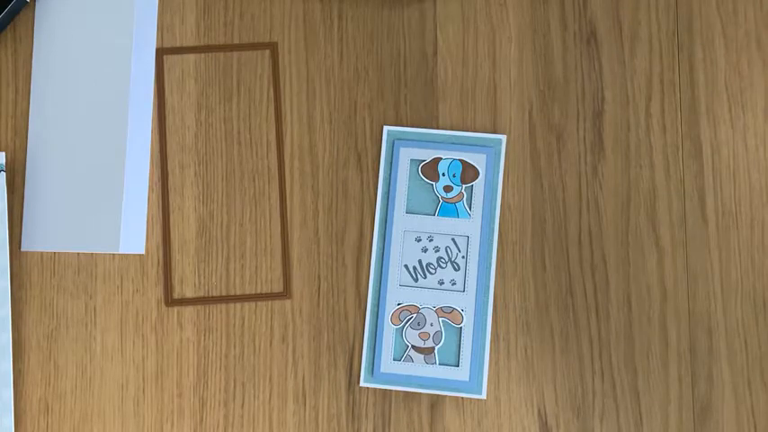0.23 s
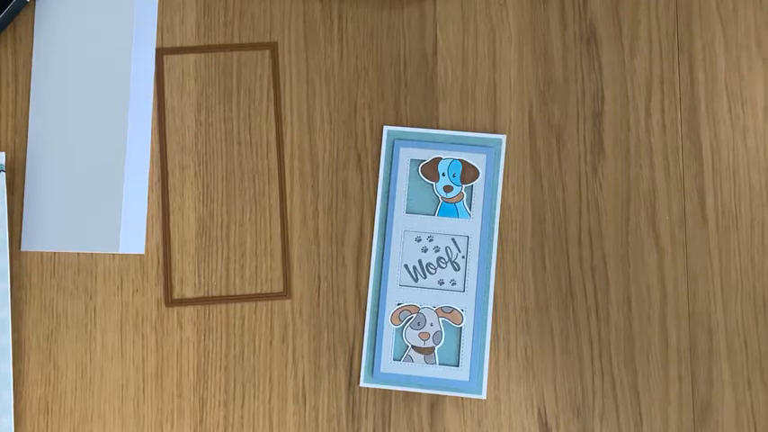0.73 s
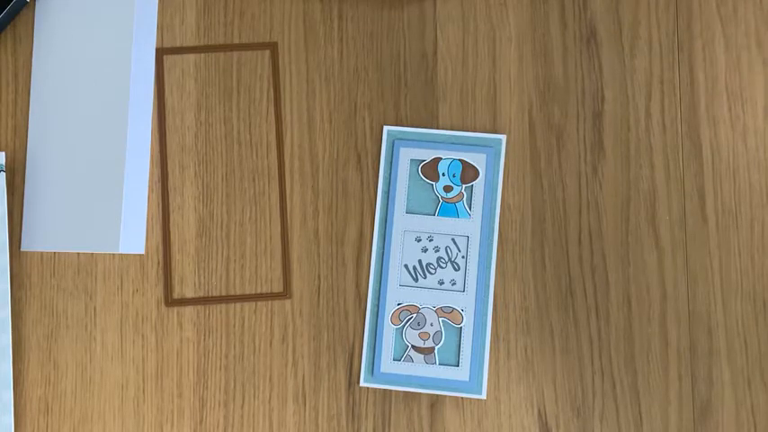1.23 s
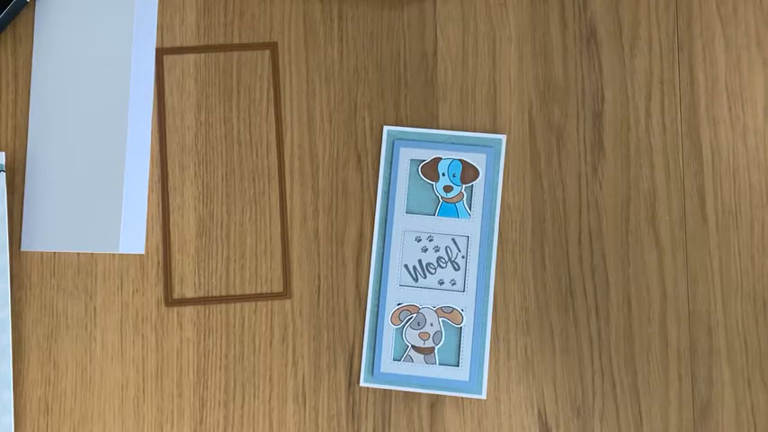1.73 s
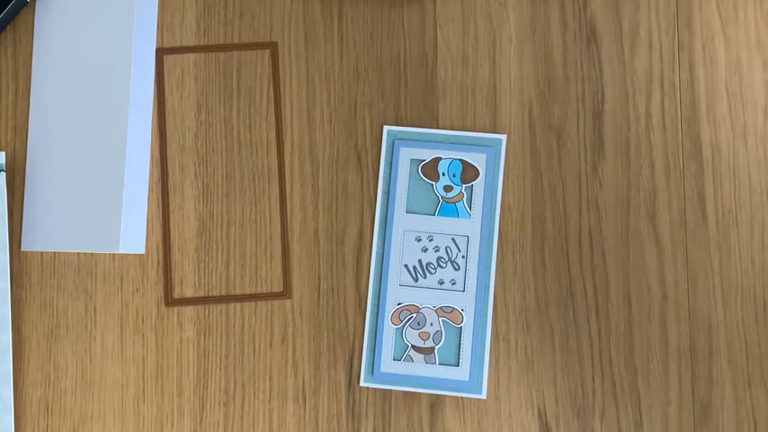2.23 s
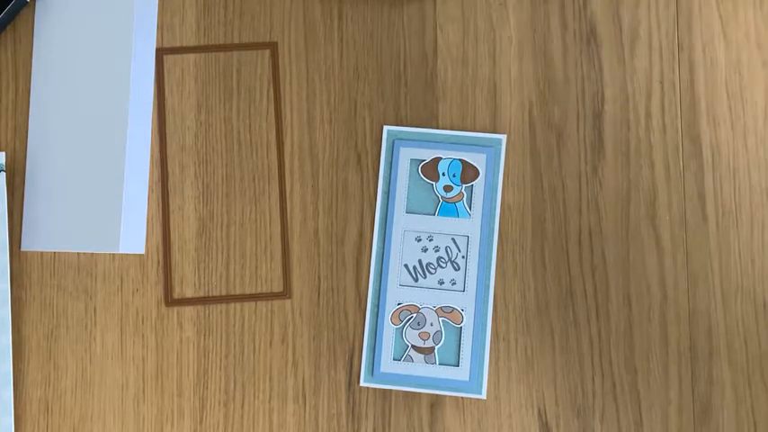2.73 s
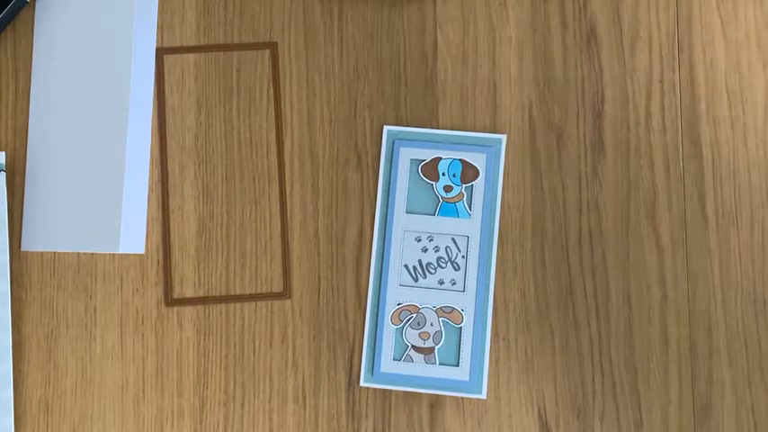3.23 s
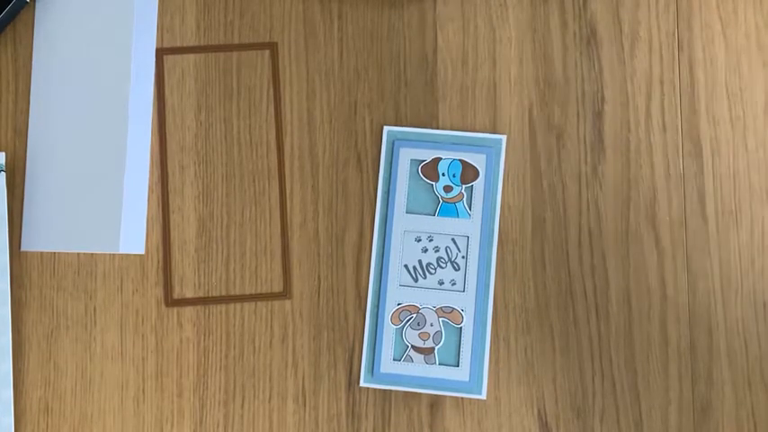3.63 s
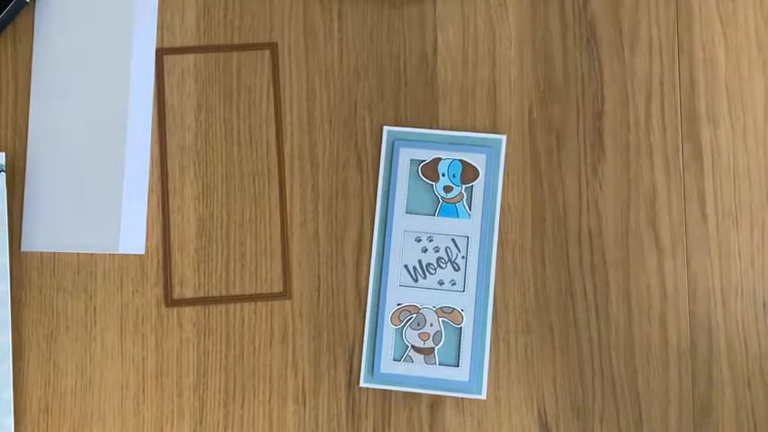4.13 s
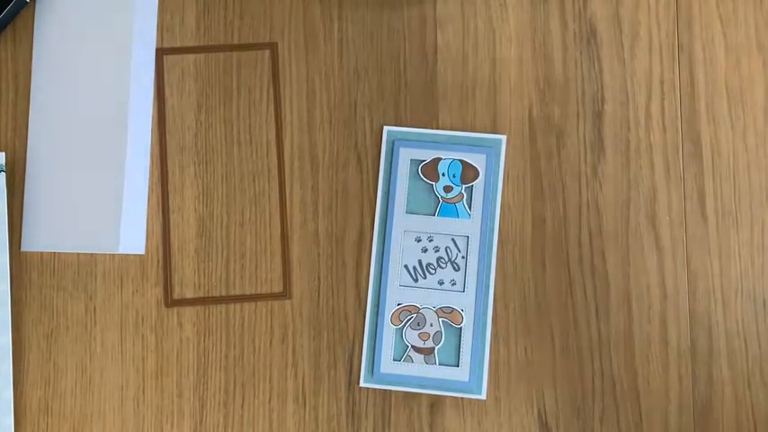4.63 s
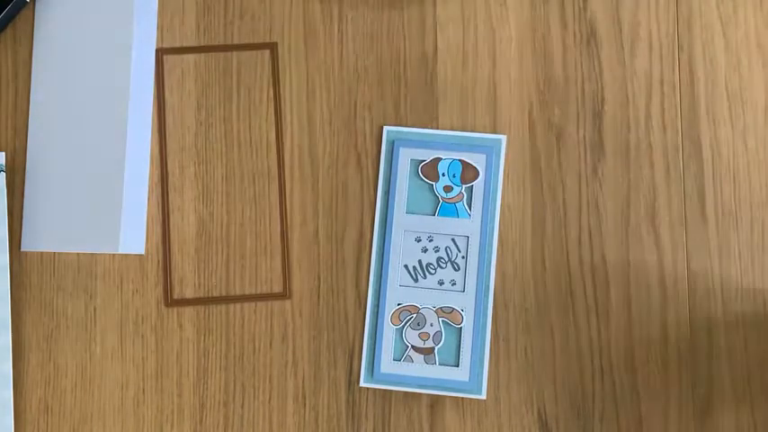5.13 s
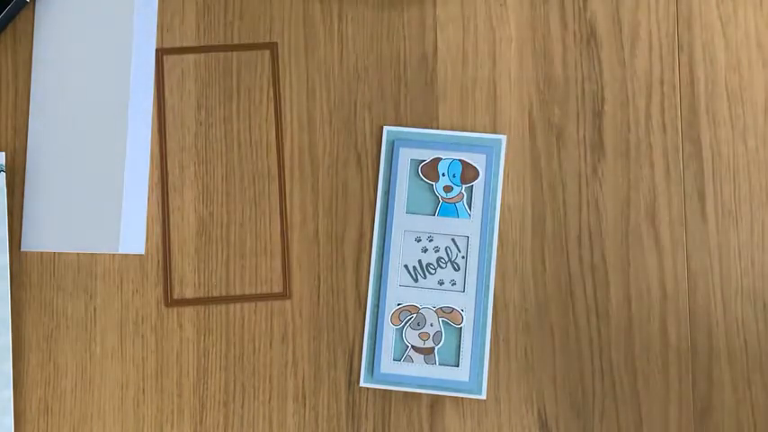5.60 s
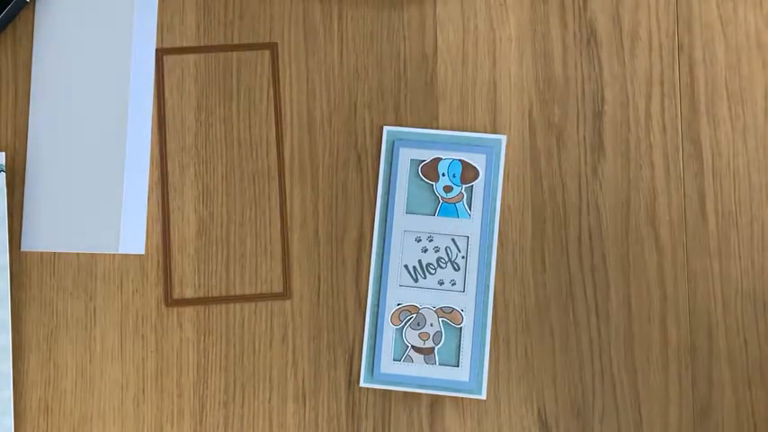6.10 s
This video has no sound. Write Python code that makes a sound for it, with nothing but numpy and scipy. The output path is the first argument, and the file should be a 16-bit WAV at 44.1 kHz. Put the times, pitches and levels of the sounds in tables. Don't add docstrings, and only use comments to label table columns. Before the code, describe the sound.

A close microphone catches a paper trimmer on a wooden table, over a faint hush of room air. First come sparse papery brushes and small taps, one sharper. Then a brief gritty cut sings and ends in a hollow thump and bright clack. The blade scrapes and knocks as it is raised; afterwards there are only quiet ticks and light paper slides with a short room tail.

```python
import sys
import numpy as np
from scipy import signal
from scipy.fft import rfft, irfft, next_fast_len
from scipy.io import wavfile
from scipy.ndimage import uniform_filter1d

SR = 44100
rng = np.random.default_rng(int(sys.argv[2]) if len(sys.argv) > 2 else 0)


def dump_mix(stems):
    frames = np.atleast_2d(stems).T
    limited = np.clip(frames, -1, 1)
    pcm = np.round(limited * 32767).astype(np.int16)
    wavfile.write(sys.argv[1], SR, pcm)


def volts_from_decibels(level):
    exponent = np.asarray(level, float) / 20
    return 10 ** exponent


N = 280520

# mode_hz, width_hz, level_db
BASE_MODES = [(122, 21, -7.5), (154.7, 14, 1.5), (183.5, 22, -8), (233, 17, -4.5), (285, 32, -4),
              (343, 19, -4), (425, 39, 1.5), (503.6, 28, -6), (592, 40, 0), (712, 100, -4.5), (830, 37, -2),
              (977, 45, -4), (1204, 34, -4), (1460, 88, -3)]
# mode_hz, width_hz, gain_db, from_s, to_s
STEEL_MODES = [(15563, 5, 17, 2.7, 3.8), (14050, 4, 10, 3.56, 3.8), (11800, 14, 7, 3.74, 3.8),
               (9500, 60, 10, 3.75, 3.78), (7900, 40, 10, 3.75, 3.79)]


def evened(x):
    return x / np.sqrt(np.mean(x ** 2) + 1e-20)


def read(points, hz):
    f, value = np.transpose(points)
    return np.interp(np.log(hz + 1), np.log(f + 1), value)


def add(mix, s, sound):
    part = mix[round(s * SR):][:len(sound)]
    part += sound[:len(part)]


def colour(x, points):
    size = next_fast_len(len(x))
    gain = volts_from_decibels(read(points, np.fft.rfftfreq(size, 1 / SR)))
    return evened(irfft(rfft(x, size) * gain, size)[:len(x)])


def band_pass(x, low_hz, high_hz):
    return signal.sosfilt(signal.butter(2, (low_hz, high_hz), "band", fs=SR, output="sos"), x)


def resonate(x, hz, width):
    pole = np.exp((2j * np.pi * hz - np.pi * width) / SR)
    return 2 * signal.lfilter([1 - abs(pole)], [1, -pole], x).real


def nearness(hz, centre_hz, octaves):
    return np.exp(-.5 * (np.log2(hz / centre_hz) / octaves) ** 2)


def drift(shape, bins, frames):
    patches = uniform_filter1d(rng.standard_normal(shape), bins, axis=0)
    return evened(uniform_filter1d(patches, frames, axis=1))


def wander(size):
    return evened(uniform_filter1d(uniform_filter1d(rng.standard_normal(N), size=size), size=size))


def hush():
    # pitch_hz, level_db (per Hz)
    air = [(15, -31), (25, -30), (52, 4), (75, 3.5), (323, -5.5), (390, -7), (568, -7.5), (633, -10),
           (1810, -20), (4400, -24.5), (5910, -20.5), (10100, -30.5), (14400, -30.5), (15600, -35)]
    hz, t, z = signal.stft(colour(rng.standard_normal(N), air), SR, nperseg=1024)
    lumps = volts_from_decibels(1.46 * drift(z.shape, 6, 5))
    return volts_from_decibels(-69.5 + 2.1) * signal.istft(z * lumps, nperseg=1024)[1][:N]


def swells(s, db, rise, fall, bend):
    late = np.arange(0, N / SR + .001, .001) - np.asarray(s)[:, None]
    away = np.where(late < 0, -late / np.reshape(rise, (-1, 1)), late / np.reshape(fall, (-1, 1)))
    return volts_from_decibels(2 * np.maximum(np.asarray(db)[:, None] - 20 * away ** bend, -140))


def gestures():
    # peak_s, peak_db, fall_s (to -20 dB), lightness (0-1)
    scuff = np.transpose([(.368, -70, .2, .6), (1.173, -58, .055, .02), (1.4, -66, .12, .13),
                          (1.567, -65, .075, .13), (1.748, -61.5, .09, .1), (1.787, -60, .08, .05),
                          (1.895, -46.5, .145, .47), (2.218, -60, .095, .17), (2.361, -57, .09, .6),
                          (2.514, -44, .075, .02), (3.112, -39, .09, .42), (3.414, -54, .24, .55),
                          (3.8, -46, .11, .15), (4.842, -61.5, .2, .5), (5.3, -69, .3, .55)])
    # peak_s, peak_db, rise_s, fall_s (20 dB each), lightness (0-1)
    sweep = np.transpose([(.01, -73, .1, .4, .3), (.495, -63, .1, .07, .47), (.68, -63, .07, .21, .47),
                          (.896, -68.5, .14, .23, .51), (3.02, -37.5, .13, .075, .42),
                          (3.3, -66, .3, .2, .53), (3.5, -65.5, .1, .12, .99), (3.548, -52, .035, .13, .99),
                          (3.592, -49.5, .09, .055, .89), (3.704, -46.5, .05, .07, .2),
                          (3.772, -39, .045, .082, .63), (4.205, -68.5, .12, .3, .5),
                          (4.345, -63.5, .09, .13, .65), (4.48, -68.5, .15, .22, .55),
                          (4.955, -63, .08, .12, .3), (5.055, -55, .13, .16, .52),
                          (5.205, -63.5, .14, .09, .55), (5.69, -65, .19, .55, .92),
                          (5.82, -69.5, .15, .2, .8), (6.006, -58, .28, .085, .82),
                          (6.052, -60.5, .1, .05, .2), (6.135, -66, .05, .2, .74),
                          (6.195, -60, .03, .15, .2), (6.27, -64, .26, .23, .95)])
    # peak_s, peak_db, fall_s (to -20 dB), centre_hz
    load = np.transpose([(.525, -52.5, .09, 560), (.585, -55, .15, 560), (.896, -65, .3, 435),
                         (1.195, -62, .07, 360), (1.41, -61.5, .06, 397), (1.582, -59.5, .06, 408),
                         (1.788, -53.5, .045, 504), (1.915, -54, .12, 520), (1.98, -55, .07, 514),
                         (2.24, -57.5, .053, 640), (2.374, -53.5, .063, 240), (2.526, -43, .042, 555),
                         (3.022, -31, .058, 290), (3.125, -45, .08, 478), (3.26, -63, .2, 365),
                         (3.44, -45.5, .11, 290), (3.63, -48.5, .2, 415), (3.704, -45.5, .06, 622),
                         (3.774, -47.5, .16, 730), (3.925, -54, .22, 300), (4.198, -64.5, .12, 375),
                         (4.344, -61.5, .3, 327), (4.565, -56, .075, 330), (4.855, -59.5, .17, 860),
                         (4.952, -59, .065, 950), (5.05, -58, .17, 480), (5.615, -59, .1, 560),
                         (5.82, -62, .09, 433), (6.065, -57, .06, 595), (6.2, -58.5, .057, 443)])
    # time_s, pressure_db, load_db (on the base, re pressure)
    cut = np.transpose([
        (2.6, -84, 12),
        (2.708, -38, -2.5),
        (2.752, -36.5, -6),
        (2.868, -28, -4),
        (2.93, -31, -17),
        (2.962, -34, -.6),
        (2.98, -42, -3),
        (3.0, -62, -3),
        (3.04, -120, -3),
    ])
    s = np.arange(0, N / SR + .001, .001)
    pressure_db = np.interp(s, cut[0], cut[1], left=-140, right=-140)

    def rubbing(span):
        scuffs = swells(*scuff[:2], .007, span * scuff[2], 1.1)
        sweeps = swells(*sweep[:2], *span * sweep[2:4], 1.25)
        return np.vstack([scuffs, sweeps, volts_from_decibels(2 * pressure_db)])

    rubs = rubbing(1)
    quick = rubbing(.72)
    rub = rubs.sum(axis=0)

    light = np.r_[scuff[3], sweep[4], .55]
    firm_sheen_db, light_sheen_db, firm_rub_hz, light_rub_hz = -35, 12, 1950, 5600
    sheen = volts_from_decibels(2 * (firm_sheen_db + (light_sheen_db - firm_sheen_db) * light)) @ quick / rub
    rub_hz = (firm_rub_hz * (light_rub_hz / firm_rub_hz) ** light ** 2.6) @ rubs / rub

    cut_load_db = pressure_db + np.interp(s, cut[0], cut[2])
    hums = np.vstack([swells(*load[:2], .45 * load[2], load[2], 1.15), volts_from_decibels(2 * cut_load_db)])
    hum = hums.sum(axis=0)
    hum_hz = np.r_[load[3], 510] @ hums / hum
    return s, 10 * np.log10(rub), 10 * np.log10(sheen), 10 * np.log10(hum), hum_hz, rub_hz


def fibres(per_s, size_db, clump_db, smooth):
    clumps = wander(300)
    sizes = volts_from_decibels(size_db * np.minimum(rng.exponential(1, N), 3.2))
    snaps = (rng.random(N) < per_s / SR) * sizes * rng.standard_normal(N)
    return volts_from_decibels(clump_db * clumps) * (evened(snaps) + smooth * rng.standard_normal(N))


def scrape(drive, s, rub_db, rub_hz):
    # pitch_hz, level_db (per Hz)
    rub_spectrum = [(410, -36), (700, -11), (813, -5), (924, -1), (1170, 1), (2130, -2), (3400, -4.5),
                    (4540, -3), (9000, -17.5), (11700, -56), (19800, -120)]
    # mode_hz, width_hz, level_db
    blade_modes = [(1470, 14, 10), (2060, 38, -5), (3820, 88, -9), (3880, 53, -9), (4140, 230, -21.5),
                   (4070, 23, -3.5), (4420, 90, 13), (5640, 93, 15)]
    hz, t, z = signal.stft(colour(drive, rub_spectrum), SR, nperseg=1024, noverlap=768)
    bins_hz = hz[:, None]
    pressure = np.clip((np.interp(t, s, rub_db) + 58) / 25, 0, 1)
    flicker = volts_from_decibels(2.6 * drift((len(blade_modes), len(t)), 1, 7))
    singing = 0
    for (mode_hz, width, db), catching in zip(blade_modes, flicker):
        singing = singing + volts_from_decibels(db) * catching / (1 + (2 * (bins_hz - mode_hz) / (width + 40)) ** 2)
    shape = 1 + 1.44 * nearness(bins_hz + 1, np.interp(t, s, rub_hz), 0.91) + 0.49 * pressure * singing
    shape = shape * volts_from_decibels(2.5 * drift(z.shape, 16, 4))
    shape = shape / np.sqrt(np.average(shape ** 2, axis=0, weights=volts_from_decibels(2 * read(rub_spectrum, hz))))
    return signal.istft(z * shape, nperseg=1024, noverlap=768)[1][:N]


def hiss(drive):
    # pitch_hz, level_db (per Hz)
    trimmer_sheen = [(2650, -12), (4500, -7), (6680, 0), (7260, 1), (8620, -2.5), (14300, -6), (15600, -11)]
    # pitch_hz, level_db (per Hz)
    table_sheen = [(2650, -12), (4500, -4), (6500, -1.5), (7800, 0), (9500, -2), (12500, -2.5), (14500, -4),
                   (15600, -6)]
    on_table_s = 5.52
    return np.where(np.arange(N) < on_table_s * SR, colour(drive, trimmer_sheen), colour(drive, table_sheen))


def base_hum(hum_hz):
    shake = band_pass(fibres(per_s=600, size_db=0.0, clump_db=1.0, smooth=1.21), 200, 900)
    hum, power = np.zeros(N), np.zeros(N)
    for hz, width, db in BASE_MODES[2:]:
        weight = volts_from_decibels(db) * nearness(hz, hum_hz, 0.63)
        hum += weight * evened(resonate(shake, hz, width))
        power += weight ** 2
    return hum / np.sqrt(power)


def slides():
    s, *columns = gestures()
    rub_db, sheen_db, hum_db, hum_hz = (np.interp(np.arange(N) / SR, s, c) for c in columns[:4])
    drive = fibres(per_s=2500, size_db=3., clump_db=1.15, smooth=2.2)
    out = volts_from_decibels(rub_db - 4.0) * scrape(drive, s, columns[0], columns[4])
    out += volts_from_decibels(rub_db + sheen_db - 1.0) * hiss(drive)
    return out + volts_from_decibels(hum_db - 4.0) * base_hum(hum_hz)


def ticks():
    # start_s, peak_db, ring_hz, t60_s, ring_db (re rattle)
    hand_ticks = [(0.4818, -50.5, 3480, 0.12, 15), (0.647, -52.5, 2740, 0.15, 4),
                  (1.1703, -52, 3050, 0.069, 25), (1.399, -60, 1510, 0.18, 15),
                  (1.5614, -53.5, 1450, 0.12, 12), (1.7473, -49.5, 3000, 0.079, 12),
                  (1.781, -48.5, 1502, 0.13, 22), (1.8905, -40, 2280, 0.1, 4),
                  (1.8957, -27, 1570, 0.086, 9), (2.2132, -47, 1510, 0.18, 12),
                  (2.364, -39, 2010, 0.052, 15), (2.5125, -42, 1650, 0.05, 10),
                  (4.1849, -56, 1640, 0.085, 16), (4.2115, -54, 1950, 0.12, 14),
                  (4.328, -51, 3450, 0.16, 11), (4.555, -58, 1200, .06, 8), (4.8289, -53.5, 2530, 0.13, 4),
                  (4.9188, -50.5, 2010, 0.24, 5), (5.0394, -48, 2490, 0.15, 14),
                  (5.2087, -50, 2920, 0.15, 17), (5.3514, -53.5, 3410, 0.12, 14),
                  (5.8336, -46, 4300, 0.12, 9), (6.1154, -44.5, 3330, 0.19, 5),
                  (6.1835, -44, 2050, 0.03, 2)]
    # start_s, peak_db, ring_hz, t60_s, ring_db (re rattle)
    blade_ticks = [
        (2.6444, -42.5, 2430, 0.094, 14),
        (2.6723, -43, 1660, .1, 8),
        (2.6772, -43, 3000, .1, 0),
        (2.684, -35, 1470, 0.25, 14),
        (2.865, -25.5, 1570, 0.34, 17),
        (3.026, -30.5, 1510, 0.23, 10),
        (3.4105, -43, 1548, 0.15, 2),
        (3.5334, -57, 4630, 0.088, 12),
        (3.695, -35, 1460, 0.12, -4),
        (3.7643, -23, 1550, 0.18, -6),
    ]
    out, t = np.zeros(N), np.arange(SR // 4) / SR
    contacts = sorted(hand_ticks + blade_ticks)
    rise = np.minimum(t / 0.0013, 1)
    for (s, db, hz, t60, ring_db), noise in zip(contacts, rng.standard_normal((len(contacts), len(t)))):
        sheen_db = -27 + 12 * np.log2(hz / 1500)
        rattle = noise * (volts_from_decibels(-60 * t / t60) + 0.5 * volts_from_decibels(-60 * t / 0.0027)) * rise
        ring = volts_from_decibels(-60 * t / (.7 * t60)) * np.sin(2 * np.pi * hz * t)
        ring += .7 * volts_from_decibels(-60 * t / .05) * np.sin(2 * np.pi * 1.04 * hz * t)
        sound = band_pass(rattle, 1000, 6750) + volts_from_decibels(ring_db - 19.5) * rise * ring
        sound += volts_from_decibels(sheen_db - 1) * band_pass(rattle, 6500, 12200)
        add(out, s - .002, volts_from_decibels(db - 4.5) * sound / abs(sound).max())
    return out


def thuds():
    # start_s, peak_db, centre_hz, damping (re the free body), spread_octaves
    blows = [(0.507, -45, 443, 0.54, 0.3), (0.554, -43.5, 573, 0.4, 0.54), (1.925, -38.5, 547, 0.78, 0.32),
             (2.214, -51, 820, 0.4, 0.41), (1.781, -52, 550, 1, .5), (2.371, -43, 165, 0.6, 0.4),
             (2.515, -41, 570, 0.78, 0.32), (2.646, -38, 414, 0.4, 0.85), (2.9895, -33, 400, 1.5, .7),
             (2.9945, -19.5, 190, 1.1, 0.85), (3.0105, -20, 165, 1.6, 0.42), (3.042, -33, 200, 2, .5),
             (3.114, -36, 330, 2, .8), (3.411, -37.5, 165, .75, 0.5), (3.446, -45, 140, 1.5, .5),
             (3.467, -41, 160, .6, .4), (3.535, -48, 200, 1.2, .6), (3.608, -45, 150, .6, .4),
             (3.611, -42, 423, 0.86, 0.88), (3.751, -43.5, 555, 0.44, 0.78), (4.209, -52.5, 387, 1, 0.8),
             (4.546, -43.5, 290, 2.4, 0.5), (4.935, -48, 935, 2.6, 0.23), (5.566, -53, 850, 0.54, 0.7),
             (6.044, -47.5, 800, 0.9, 0.6), (6.189, -51, 435, 0.63, 0.76)]
    out, t = np.zeros(N), np.arange(SR // 2) / SR
    for (s, db, centre_hz, damping, octaves), chance in zip(blows, rng.random((len(blows), len(BASE_MODES)))):
        sound = np.zeros(len(t))
        for (hz, width, mode_db), c in zip(BASE_MODES, chance):
            level = volts_from_decibels(mode_db) * nearness(hz, centre_hz, octaves)
            decay = np.exp(-np.pi * width * damping * t)
            sound += level * decay * np.sin(2 * np.pi * (hz * t + .5 + 0.37 * c))
        contact_s = 1.126 / centre_hz
        sound = sound * np.sin(np.pi / 2 * np.minimum(t / contact_s, 1)) ** 2
        add(out, s - 0.915 * contact_s, volts_from_decibels(db - 2.0) * sound / abs(sound).max())
    return signal.sosfilt(signal.butter(2, 85, "high", fs=SR, output="sos"), out)


def catches():
    # peak_s, tone_hz, peak_db, half_length_s
    slip_tones = [(.58, 599, -51, 0.038), (.61, 343, -61, 0.057), (2.686, 1020, -44, .008),
                  (2.71, 1010, -46, .035), (2.72, 1465, -46, .05), (2.739, 2438, -49, .025),
                  (2.755, 822, -41.5, .035), (2.822, 830, -38, .025), (2.745, 425, -36.5, 0.088),
                  (2.787, 1474, -39.5, 0.033), (2.797, 425, -33.5, 0.017), (2.796, 4330, -37, .008),
                  (2.817, 4500, -35, .01), (2.85, 6000, -40, .02), (2.875, 4450, -36, .018),
                  (2.975, 3750, -42, .02), (2.828, 2140, -34.5, .022), (2.86, 425, -32.5, 0.035),
                  (2.87, 2183, -33.5, 0.018), (2.875, 592, -38.5, 0.038), (2.878, 285, -33.5, 0.043),
                  (2.895, 1187, -35.5, 0.031), (2.91, 4610, -35.5, 0.033), (2.92, 1510, -43, 0.018),
                  (2.94, 3930, -38, 0.036), (2.99, 1490, -41.5, 0.031), (3.004, 568, -32.5, 0.0189),
                  (3.034, 425, -33, 0.014), (3.043, 820, -44, 0.024), (3.43, 600, -54, .03),
                  (3.44, 940, -57, .035), (3.465, 560, -54, .02), (3.545, 560, -54, .02),
                  (3.612, 1580, -56, .015), (3.622, 450, -48, .018), (3.652, 370, -50, .015),
                  (3.68, 700, -51.5, 0.035), (3.715, 620, -48, .012), (3.738, 1420, -52, .015),
                  (3.757, 600, -46, .012), (3.795, 2030, -46, .022), (3.825, 800, -51, .025),
                  (3.865, 1380, -58, .022), (3.765, 1480, -44, 0.015), (3.79, 830, -40.5, 0.031),
                  (4.565, 1240, -64.5, 0.017), (4.948, 992, -54.5, 0.021),
                  (.52, 430, -46, .016), (.535, 950, -58, .03), (.7, 450, -60, .04), (.805, 3600, -71, .015),
             (1.79, 520, -56, .015), (1.8, 1550, -60, .025), (1.903, 2450, -46, .014),
             (1.903, 1600, -45, .012), (1.908, 550, -48, .014), (1.94, 560, -44, .009),
             (1.945, 1600, -52, .02), (1.995, 590, -52, .035), (2.385, 2060, -62, .02),
             (2.42, 1590, -63, .022), (2.522, 580, -42, .016), (2.525, 1150, -48, .02),
             (2.53, 1500, -48, .015), (2.558, 1580, -54, .022), (4.57, 700, -60, .015),
             (4.86, 900, -60, .04), (4.95, 1500, -61, .015), (5.03, 2200, -62, .03),
             (5.09, 1550, -60, .025), (5.11, 2200, -63, .02), (6.005, 3350, -60, .035),
             (6.015, 1660, -62, .018), (6.015, 1250, -62, .02), (6.05, 3400, -62, .02),
             (6.062, 590, -53, .03), (6.06, 1660, -63, .02), (6.186, 3250, -53, .004),
             (6.187, 1800, -56, .003), (6.184, 2600, -51, .002), (6.205, 440, -55, .02)]
    out = np.zeros(N)
    slips = wander(250)
    for s, hz, db, length in slip_tones:
        t = np.arange(-length, length, 1 / SR)
        waver = .8 * max(hz / 900, 1) ** .75 * slips[round(s * SR):][:len(t)]
        swell = np.cos(np.pi / 2 * t / length) ** 2
        add(out, s - length, volts_from_decibels(db) * swell * np.cos(2 * np.pi * hz * t + waver))
    return out


def steel(rubbing):
    t, out = np.arange(N) / SR, np.zeros(N)
    for hz, width, db, start, end in STEEL_MODES:
        out += volts_from_decibels(db) * resonate(rubbing * ((t > start) & (t < end)), hz, width)
    return out


def clack():
    # start_s, peak_db
    hits = [
        (3.1065, -48),
        (3.1112, -34),
    ]
    # mode_hz, level_db, t60_s
    stop_modes = [(2488, 0, 0.085), (2516, -9, 0.17), (2200, 2, 0.022), (2850, 2, .018), (1700, -6, .06),
                  (1550, -6, 0.12), (1980, -16, 0.11), (1210, -8, .05), (865, -8, .06), (300, -6, 0.037)]
    out, t = np.zeros(N), np.arange(SR // 3) / SR
    ring = sum(volts_from_decibels(mode_db - 60 * t / t60) * np.sin(2 * np.pi * hz * t) for hz, mode_db, t60 in stop_modes)
    ring = ring * np.minimum(t / .0012, 1)
    for s, db in hits:
        add(out, s, volts_from_decibels(db) * ring)
    return out


def room(x):
    # pitch_hz, t60_s
    room_decay = [(100, 0.49), (500, 0.25), (2000, 0.29), (6000, 0.21), (14000, 0.31)]
    taps = np.zeros(SR // 2)
    at = np.arange(200, len(taps) - 20, 20)
    taps[at + rng.integers(0, 20, len(at))] = rng.choice([-1., 1.], len(at))
    hz, t, z = signal.stft(taps, SR, nperseg=256)
    tail = signal.istft(z * volts_from_decibels(-60 * t / read(room_decay, hz)[:, None]), SR, nperseg=256)[1]
    return signal.fftconvolve(x, tail / np.linalg.norm(tail))[:N]


def scene():
    trimmer = slides() + catches() + ticks() + thuds() + clack()
    return (trimmer + steel(trimmer) + volts_from_decibels(-8.5) * room(trimmer) + hush())[None]


def drop_top_band(x):
    # from_s, to_s, edge_hz
    dulled = [
        (2.8, 2.875, 15150),
        (2.875, 3.0, 14400),
        (3.785, 3.84, 14450),
        (3.84, 3.865, 15200),
    ]
    hz, t, z = signal.stft(x, SR, nperseg=1024)
    hz = hz[:, None]
    lost = sum((t > start) & (t < end) & (hz > edge_hz) for start, end, edge_hz in dulled)
    lost = lost * (abs(hz - STEEL_MODES[0][0]) > 70)
    return signal.istft(z * (lost == 0), nperseg=1024)[1][..., :N]


def roll_off(x):
    return signal.sosfilt(signal.butter(12, 15730, fs=SR, output="sos"), x)


def record(dry):
    heard = signal.sosfilt(signal.butter(4, 45, "high", fs=SR, output="sos"), dry)
    return roll_off(drop_top_band(heard))


dry = scene()
out = record(dry)
dump_mix(out)
```